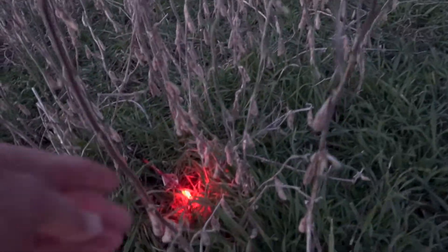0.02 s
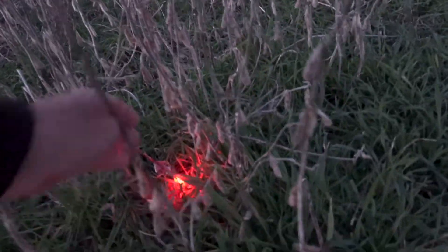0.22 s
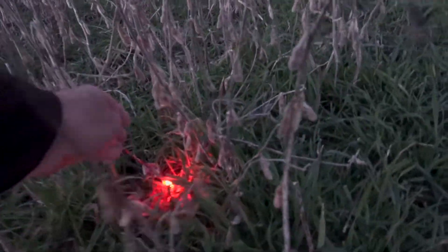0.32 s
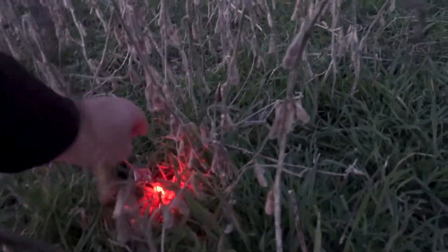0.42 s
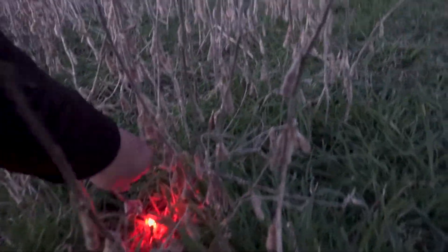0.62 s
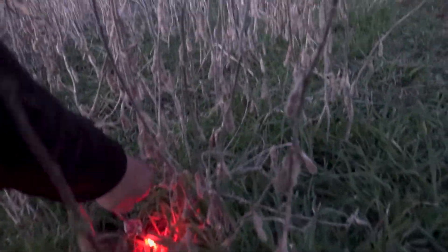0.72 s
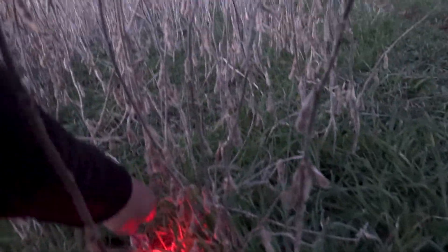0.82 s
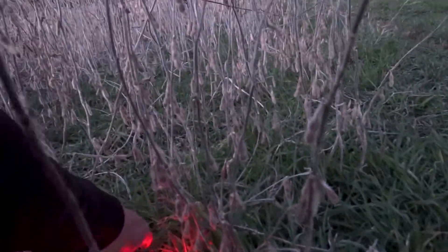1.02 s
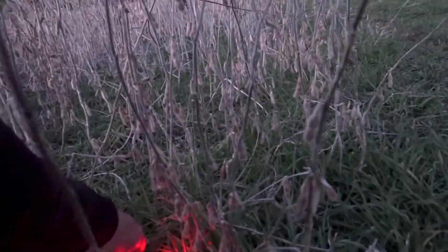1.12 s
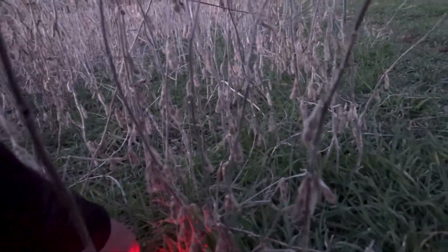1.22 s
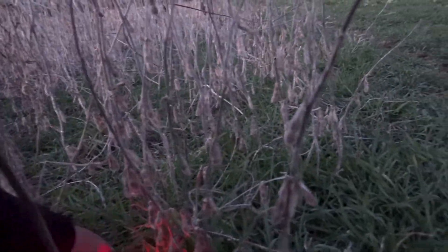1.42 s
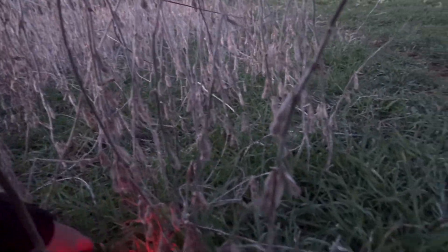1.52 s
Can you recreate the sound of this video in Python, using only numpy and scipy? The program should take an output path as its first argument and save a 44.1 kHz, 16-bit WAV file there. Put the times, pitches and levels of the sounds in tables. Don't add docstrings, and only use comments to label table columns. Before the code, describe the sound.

Dry stalks and pods crack at once, with sharp snaps before 0.1 s. Around 0.2-0.35 s the grip judders low on the recorder case while leaves rustle and a stem squeaks faintly. Snaps follow at 0.36-0.5 s, then the densest crackling burst and boom at 0.6 s. Rustling thins through 0.9 s; a hollow pod knocks at 1.26 s, then faint ticks over soft breeze and hiss.

```python
import sys
import numpy as np
from scipy import signal
from scipy.fft import rfft, irfft
from scipy.io import wavfile
from scipy.ndimage import uniform_filter1d

SR = 44100
rng = np.random.default_rng(int(sys.argv[2]) if len(sys.argv) > 2 else 0)


def makeup_ratio(level_db):
    decades = np.asarray(level_db, float) / 20
    return 10 ** decades


def materialize(psi):
    bounded = np.clip(np.atleast_2d(psi).T, -1, 1)
    quanta = np.round(bounded * 32767).astype(np.int16)
    wavfile.write(sys.argv[1], SR, quanta)


N = 68355


def unit(x):
    return x / np.sqrt(np.mean(x ** 2))


def peak_unit(x):
    return x / np.abs(x).max()


def curve(rows):
    rows = np.array(rows)
    return makeup_ratio(np.interp(np.arange(N) / SR, rows[:, 0], rows[:, 1]))


def ring(x, hz, width):
    hz = min(hz, 0.45 * SR)
    return signal.lfilter(*signal.iirpeak(hz, max(hz / width, 0.3), fs=SR), x)


def colour(x, points):
    points = np.array(points)
    freqs = np.maximum(np.fft.rfftfreq(8192, 1 / SR), 1)
    log_gain = np.interp(np.log(freqs), np.log(points[:, 0]), points[:, 1]) * np.log(10) / 20
    cepstrum = irfft(log_gain)
    cepstrum[1:4096] *= 2
    cepstrum[4097:] = 0
    response = irfft(np.exp(rfft(cepstrum)))
    return signal.fftconvolve(x, response)[:len(x)]


def walk(rate):
    k = int(SR / rate)
    steps = np.repeat(rng.standard_normal(N // k + 1), k)
    return unit(uniform_filter1d(uniform_filter1d(steps, k), k)[:N])


def add(out, s, x):
    i = max(int(s * SR), 0)
    out[i:i + len(x)] += x[:len(out) - i]


def crackle(size, rate, spread_db):
    clicks = rng.random(size) < rate / SR
    sizes = rng.standard_normal(size) * makeup_ratio(spread_db * rng.exponential(size=size))
    return unit(clicks * sizes)


# frequency in Hz, level in dB.
AIR = [(15, -4.5), (30, -3), (60, -12), (150, -26), (900, -33.5), (3000, -59), (10500, -58.5), (12000, -58),
       (16000, -40.5)]


def air():
    return unit(colour(rng.standard_normal(N), AIR)) * makeup_ratio(-44 + 0.46 * walk(6.4))


# time in seconds, level in dB.
STIR = [(0, -51), (.12, -51.5), (.17, -45), (.25, -43.5), (.3, -39), (.4, -41.5), (.47, -48.5),
        (.587, -50.5), (.6, -26), (.66, -34), (.69, -38.5), (.79, -36.5), (.88, -46), (.96, -48.5),
        (1.2, -51.5), (1.28, -46.5), (1.37, -52.5), (1.55, -47)]
# frequency in Hz, level in dB.
LEAVES = [(290, -12.5), (500, -8), (1260, -4), (2500, -1.5), (4030, -1.5), (5240, 0), (7100, -1.5),
          (12900, -3), (16000, -15)]
GRAINS_PER_S, GRAIN_SPREAD_DB, RUSTLE_DB = 7000, 2.2, -1


def rustle():
    out = np.zeros(N)
    for hz in 700 * 2 ** np.arange(0, 4.6, 0.5):
        grains = ring(crackle(N, GRAINS_PER_S, GRAIN_SPREAD_DB), hz, hz / 2.36) / np.sqrt(hz)
        out += grains * makeup_ratio(2.5 * walk(40))
    return unit(colour(out, LEAVES)) * curve(STIR) * makeup_ratio(RUSTLE_DB + walk(200))


# time in seconds, level in dB.
FUMBLE = [(0, -60), (.14, -52), (.3, -41), (.36, -47.5), (.4, -45.5), (.47, -54), (.56, -50.5),
          (.605, -42.5), (.66, -44), (.72, -52), (.78, -48.5), (.93, -50.5), (.97, -56), (1.28, -54.5),
          (1.34, -55.5), (1.45, -53), (1.52, -50), (1.55, -53)]
# frequency in Hz, width in Hz, level in dB.
CASE = [
    (148.4, 39, -0.5),
    (238.6, 66.7, 1),
    (298, 116, -4),
    (538, 123, -3.5),
    (702, 470, -12.5),
]


def fumble():
    grit = crackle(N, 2000, 1)
    modes = sum(makeup_ratio(db) * unit(ring(ring(grit, hz, width), hz, 1.31 * width)) for hz, width, db in CASE)
    return unit(modes) * curve(FUMBLE) * makeup_ratio(4.5)


# start in seconds, peak level in dB,
# ring frequency in Hz, broad crack level in dB, thick stem level in dB.
SNAPS = [(.0293, -13.5, 5020, 5.5, -1.5), (.0582, -33, 7500, -10, -10), (.0953, -14.5, 12800, 3.5, 6),
         (.3598, -18.5, 9000, 0, -20), (.3932, -22, 9000, 7, -20), (.4521, -28, 5500, -12, -20),
         (.4556, -28, 3800, -16, -20), (.4985, -24, 5200, 6, -2), (.4998, -22, 8100, 3, -10),
         (.5995, -10, 4900, -6, -18), (.5998, -14, 7400, -8, -25), (.6092, -15, 4200, -4, -10),
         (.6105, -12, 6200, -2, -10), (.6127, -17, 2200, 0, -6), (.6272, -14, 5200, -6, -14),
         (.6968, -18, 3550, 1, -29), (.7726, -20, 5350, 7, -9), (1.2572, -30, 3000, -14, 0)]
# start in seconds, peak level in dB, ring frequency in Hz.
TICKS = [(.008, -43, 4760), (0.0782, -41, 5300), (0.206, -39, 4500), (0.266, -37, 3300), (.275, -37, 8500),
         (.377, -27, 4200), (.418, -31, 3800), (.3018, -24, 5500), (0.383, -25, 9500), (.433, -48, 8300),
         (.553, -58, 6040), (0.907, -37.5, 8360), (1.0065, -34, 1440), (1.0605, -34.5, 3700),
         (1.1004, -60, 2500), (1.13, -33, 3800), (1.2205, -30, 3870), (.8368, -25, 8000),
         (1.473, -35, 6800), (1.5137, -26, 8300), (1.531, -34.5, 3700), (1.536, -33, 2540)]
TICK_BROAD_DB, TICK_STEM_DB = -8, -20
SNAP_Q, SNAP_RISE_S, SNAP_T60_S = 2.5, 0.0002, 0.013
CRACK_HZ, CRACK_WIDTH_HZ, STEM_HZ, STEM_WIDTH_HZ = 9000, 15000, 850, 820
LITTER_DB, LITTER_T60_S = -18, 0.025


def snaps():
    out, t = np.zeros(N), np.arange(4096) / SR
    ticks = [tuple(row) + (TICK_BROAD_DB, TICK_STEM_DB) for row in TICKS]
    for s, db, hz, broad_db, stem_db in list(SNAPS) + ticks:
        fall = makeup_ratio(-60 * t / SNAP_T60_S) + 3 * np.exp(-t / 0.0005)
        burst = rng.standard_normal(len(t)) * (1 - np.exp(-t / SNAP_RISE_S)) * fall
        pod = peak_unit(ring(ring(burst, hz, hz / SNAP_Q), hz, hz))
        broad = peak_unit(ring(burst, CRACK_HZ, CRACK_WIDTH_HZ))
        stem = peak_unit(ring(burst, STEM_HZ, STEM_WIDTH_HZ))
        crack = pod + makeup_ratio(broad_db) * broad + makeup_ratio(stem_db) * stem
        crumbs = unit(ring(ring(rng.standard_normal(len(t)), hz, hz), hz, hz))
        litter = crumbs * makeup_ratio(LITTER_DB - 60 * t / LITTER_T60_S)
        add(out, s, makeup_ratio(db) * (peak_unit(crack) + litter))
    return out


# start in seconds, peak level in dB,
# frequency in Hz, 60 dB decay in seconds.
KNOCKS = [(.0293, -28, 330, .01), (.0953, -26, 380, .01), (.0955, -25, 1500, .008),
          (.0583, -27, 4600, .009), (.4518, -22, 4900, .006), (.4542, -23, 4300, .008),
          (.5186, -22, 1300, .002), (.8601, -20, 1950, .016), (.8601, -23, 4800, .009),
          (.8628, -26, 2250, .022), (.6105, -19, 1600, .012), (1.257, -9, 1850, .007),
          (1.2571, -14, 3400, .006), (1.2571, -20, 2700, .006), (1.2602, -26, 2300, .008),
          (1.2606, -29, 3800, .012)]


def knocks():
    out, t = np.zeros(N), np.arange(4096) / SR
    for s, db, hz, t60 in KNOCKS:
        rise = 1 - np.exp(-t / SNAP_RISE_S)
        add(out, s, -makeup_ratio(db - 60 * t / t60) * np.sin(2 * np.pi * hz * t) * rise)
    return out


# start in seconds, length in seconds, level in dB,
# ring frequency in Hz.
SCRAPES = [(0.135, 0.028, -40, 8700), (.136, 0.018, -42, 4400), (.031, .016, -44, 2200),
           (0.156, 0.0075, -36, 9300), (0.147, 0.013, -35, 4300), (0.149, 0.014, -33.5, 4800),
           (0.289, 0.026, -36, 4440), (0.338, 0.059, -43, 9900), (0.593, 0.0074, -29, 5600),
           (0.6085, 0.006, -20, 4200), (.609, .03, -33, 2200), (0.609, 0.008, -27, 10500),
           (.6257, 0.0074, -23, 4700), (.627, .005, -27, 7600), (0.6413, 0.007, -25, 4300),
           (0.6562, 0.007, -26.5, 4100), (0.667, 0.0076, -32, 4350), (0.695, 0.012, -31.5, 9000),
           (0.774, 0.0067, -27.5, 4600), (.778, 0.023, -36.5, 7950), (0.808, 0.045, -43.5, 4570),
           (0.837, 0.012, -36, 8900), (.835, 0.012, -36.5, 4000), (1.035, 0.021, -51.5, 8300),
           (1.126, 0.099, -58, 8400), (1.257, 0.045, -51, 7760), (1.256, 0.02, -39, 3100),
           (1.129, 0.0051, -45.5, 9000), (.236, 0.0075, -40, 8400), (0.284, 0.027, -42.5, 8800)]
SCRAPE_Q, SCRAPE_BROAD_DB, SCRAPE_GLIDE = 2.2, -3.5, 0.25


def scrapes():
    out = np.zeros(N)
    grit = unit(colour(crackle(N, 20000, 1), LEAVES))
    for s, length, db, hz in SCRAPES:
        i, t = int(s * SR), np.linspace(0, 1, int(length * SR))
        x = grit[i:i + len(t)]
        end_hz = hz * (1 + SCRAPE_GLIDE)
        low = unit(ring(ring(x, hz, hz / SCRAPE_Q), hz, hz / SCRAPE_Q))
        high = unit(ring(ring(x, end_hz, end_hz / SCRAPE_Q), end_hz, end_hz / SCRAPE_Q))
        swell = np.sin(np.pi * t ** 0.44) ** 1.8
        body = (1 - t) * low + t * high + makeup_ratio(SCRAPE_BROAD_DB) * unit(x)
        add(out, s, makeup_ratio(db) * swell * body)
    return out


# time in seconds, level in dB.
GRIP = [
    (.19, -50),
    (.225, -36),
    (.255, -39),
    (.28, -32),
    (.3, -25),
    (.333, -29),
    (.342, -44),
    (.36, -55),
]
# frequency in Hz, width in Hz, level in dB.
RUB = [
    (111, 53, 14.5),
    (169, 11.4, 7),
    (188, 130, 3.5),
    (345, 800, -2.5),
]
SLIP_HZ, SLIP_JITTER = 103, 0.13


def rub():
    t = np.arange(N) / SR
    phase = np.cumsum(SLIP_HZ * (1 + SLIP_JITTER * walk(50))) / SR
    slips = np.diff(np.floor(phase), prepend=0) * makeup_ratio(walk(68))
    modes = sum(makeup_ratio(db) * unit(ring(ring(slips, hz, width), hz, hz)) for hz, width, db in RUB)
    touching = (t > GRIP[0][0]) & (t < GRIP[-1][0])
    return unit(modes) * curve(GRIP) * touching


# start in seconds, level in dB, frequency in Hz,
# rise in seconds, 60 dB decay in seconds.
BUMPS = [(0.206, -19.5, 35.5, 0.029, 0.17), (0.261, -18, 30.2, 0.024, 0.19),
         (.43, -26.5, 59.3, 0.0061, 0.11), (.49, -25.5, 298, 0.0038, 0.04), (.595, -21, 69.5, 0.0049, 0.17),
         (0.604, -21.5, 129.6, 0.0011, 0.068), (0.604, -26.5, 281, 0.00091, 0.16),
         (0.6294, -17, 41.45, 0.0051, 0.47), (0.619, -23.5, 26.36, 0.01, 0.87),
         (0.762, -26, 296, 0.0034, 0.03), (0.798, -25, 106, 0.0063, 0.1), (0.903, -20.5, 71, 0.0044, 0.062),
         (0.926, -28, 437, 0.0042, 0.033), (0.991, -30, 34.3, 0.01, 0.12), (1.061, -33, 28.5, 0.0075, 0.45),
         (1.108, -22, 71, 0.00082, 0.088), (1.106, -22.5, 196, 0.00094, 0.022),
         (1.2, -29.5, 30, 0.0092, 0.19)]


def bumps():
    out, t = np.zeros(N), np.arange(N) / SR
    for s, db, hz, rise, t60 in BUMPS:
        swell = 1 - np.exp(-(t / rise) ** 2)
        add(out, s, -makeup_ratio(db - 60 * t / t60) * swell * np.sin(2 * np.pi * hz * t))
    return out


SQUEAK_HZ, SQUEAK_S, SQUEAK_LEN_S, SQUEAK_DB = 5200, 0.278, 0.086, -42


def squeak():
    u = np.clip((np.arange(N) / SR - SQUEAK_S) / SQUEAK_LEN_S, 0, 1)
    tone = unit(ring(rng.standard_normal(N), SQUEAK_HZ, 190))
    return tone * np.sin(np.pi * u) ** 0.17 * makeup_ratio(SQUEAK_DB)


def scene():
    plants = snaps() + knocks() + scrapes() + rustle() + squeak()
    case = bumps() + rub() + fumble()
    return (plants + case + air())[None]


def top_cut(x):
    return signal.sosfilt(signal.butter(12, 16800, fs=SR, output="sos"), x)


def record(dry):
    low_pass = signal.ellip(12, 0.2, 70, 15750, fs=SR, output="sos")
    mix = signal.sosfilt(low_pass, dry)
    return top_cut(mix)


dry = scene()
out = record(dry)
materialize(out)
```